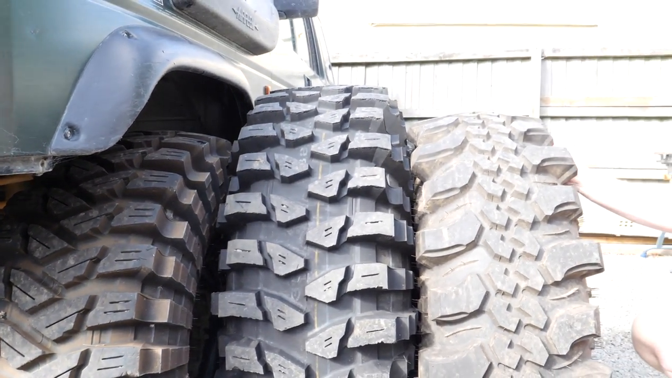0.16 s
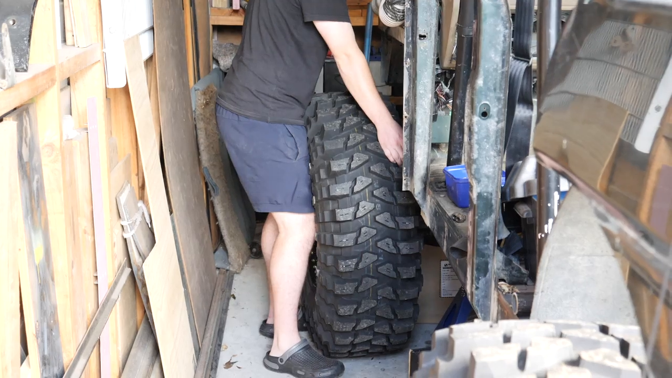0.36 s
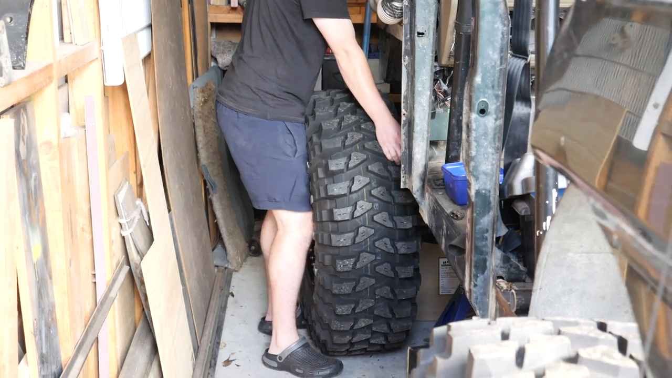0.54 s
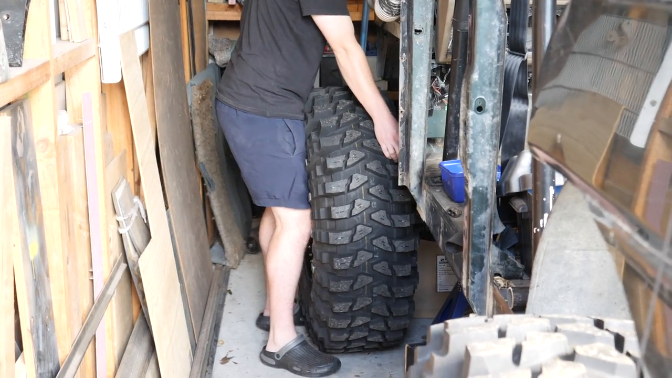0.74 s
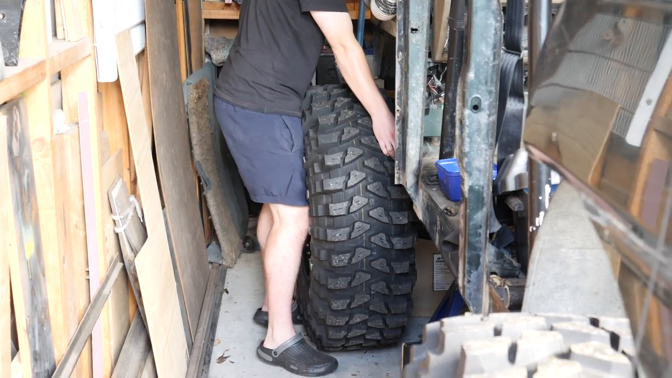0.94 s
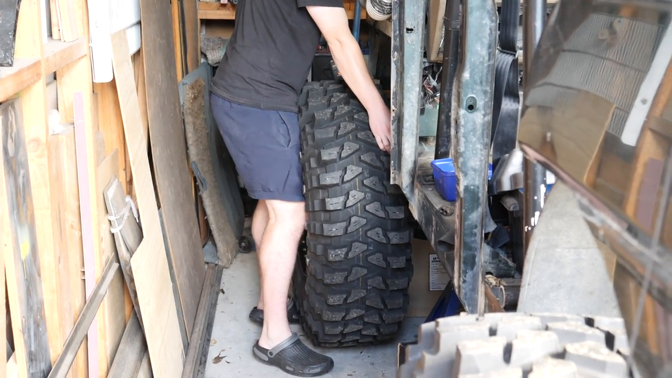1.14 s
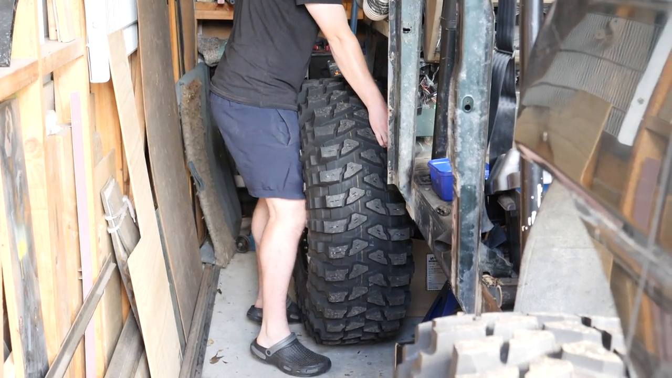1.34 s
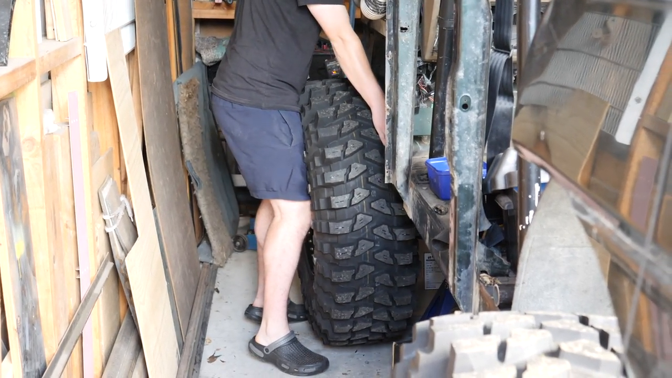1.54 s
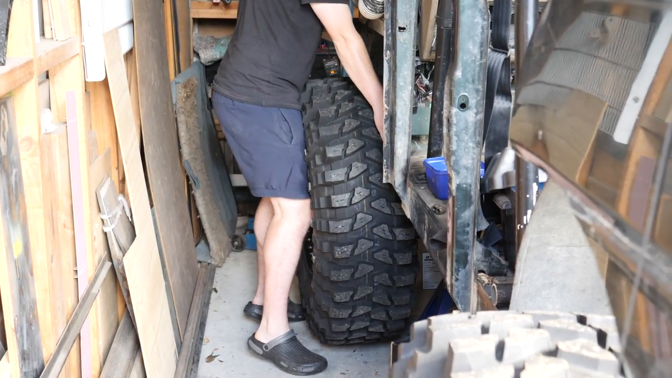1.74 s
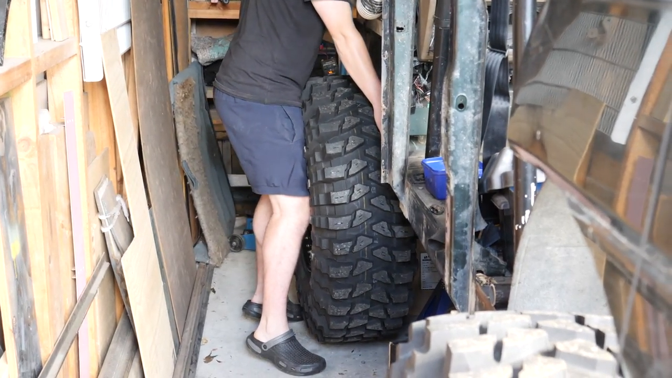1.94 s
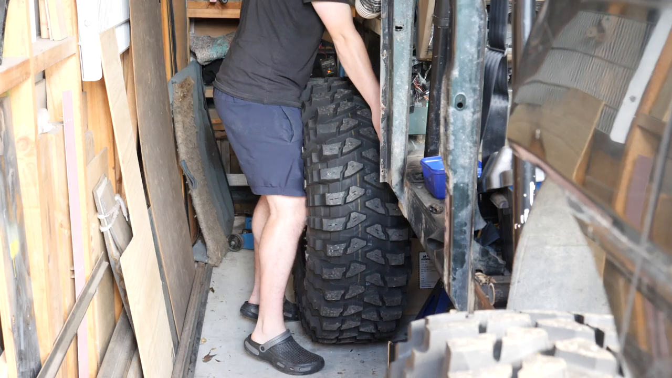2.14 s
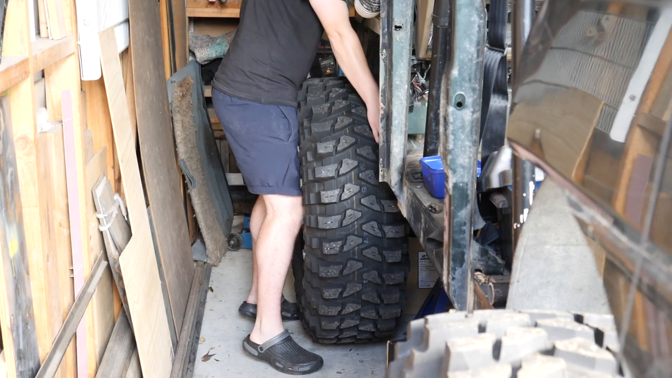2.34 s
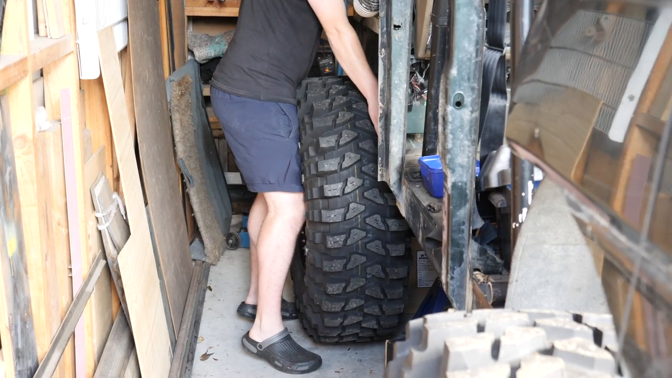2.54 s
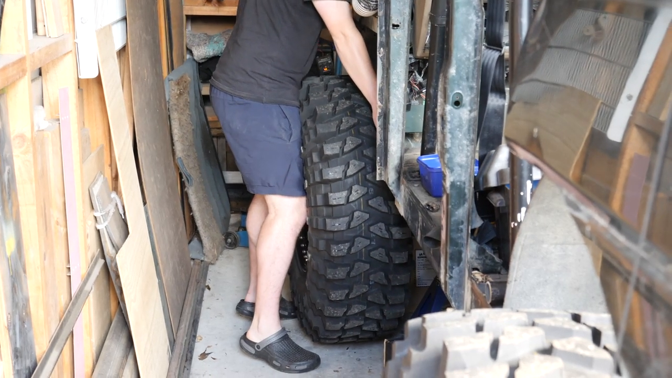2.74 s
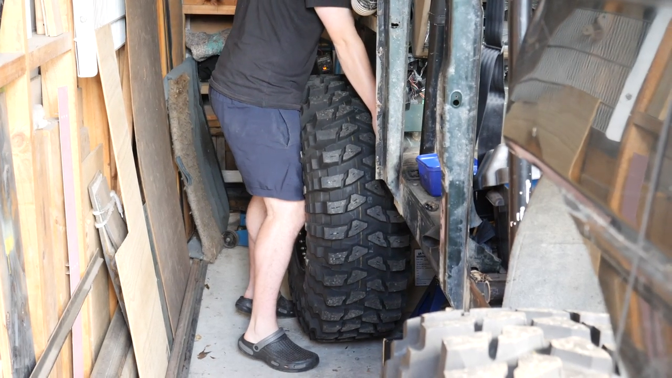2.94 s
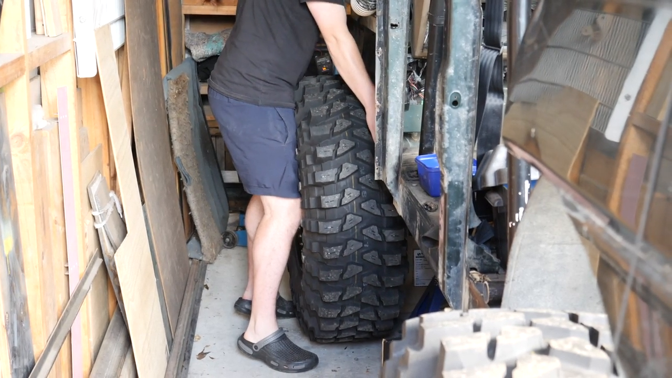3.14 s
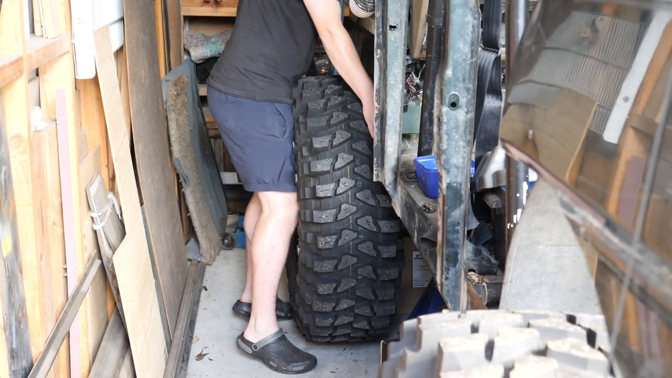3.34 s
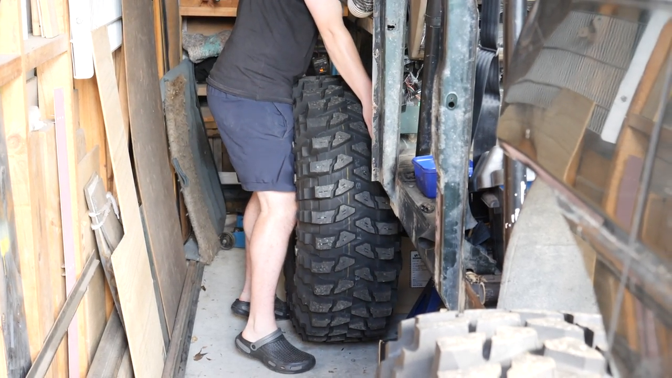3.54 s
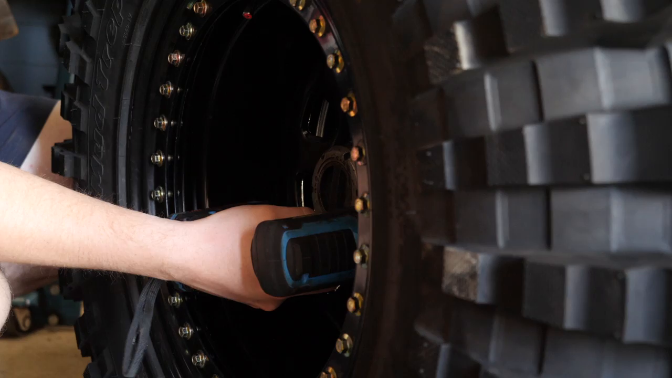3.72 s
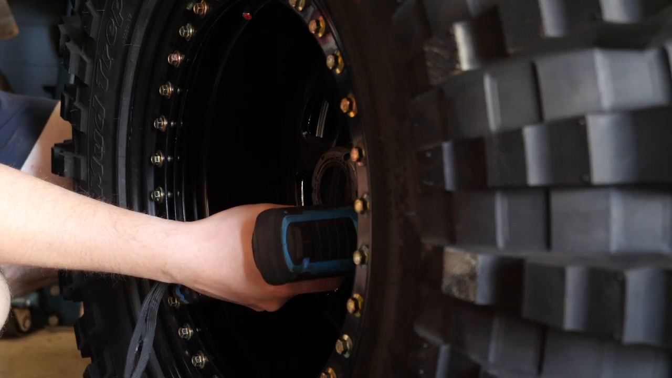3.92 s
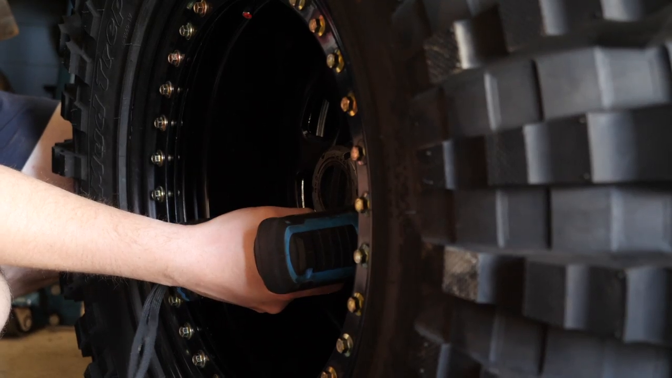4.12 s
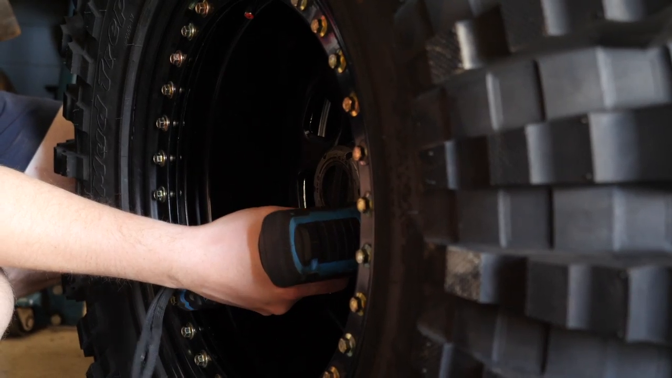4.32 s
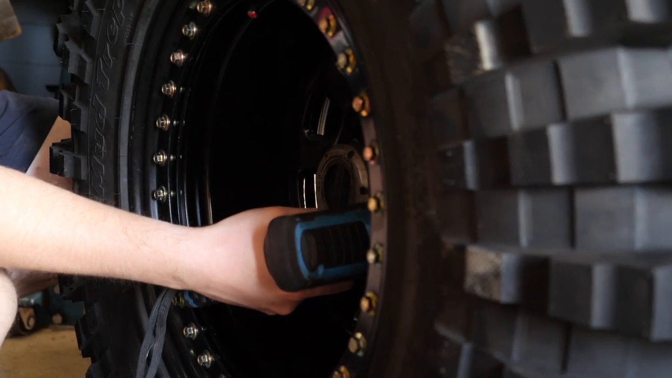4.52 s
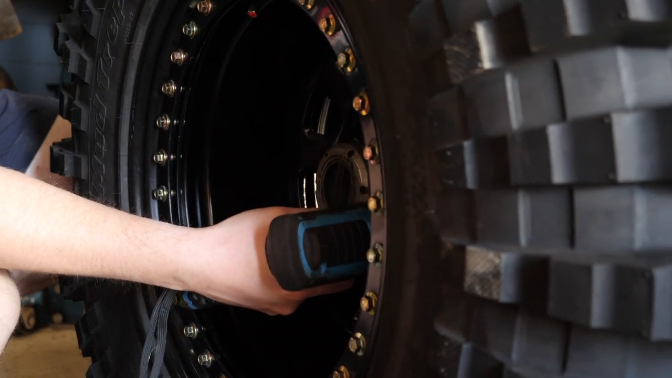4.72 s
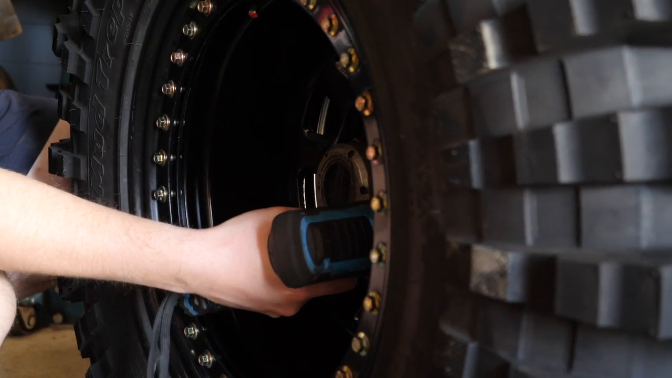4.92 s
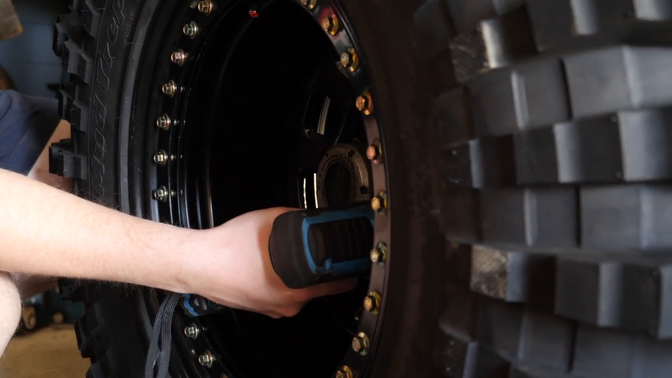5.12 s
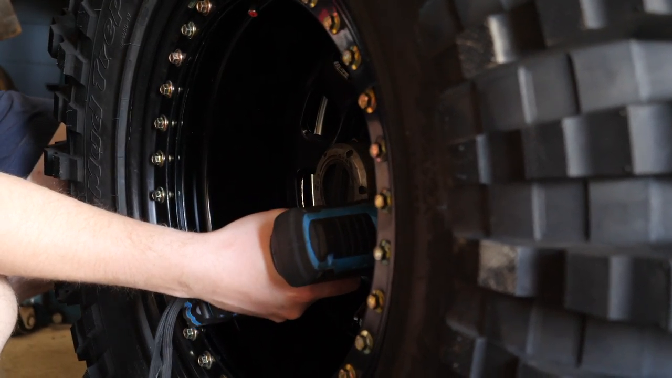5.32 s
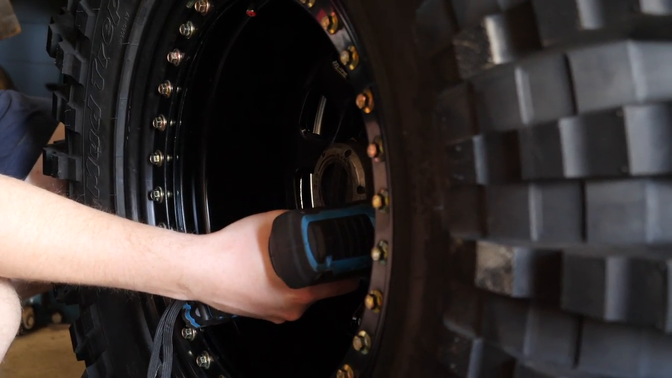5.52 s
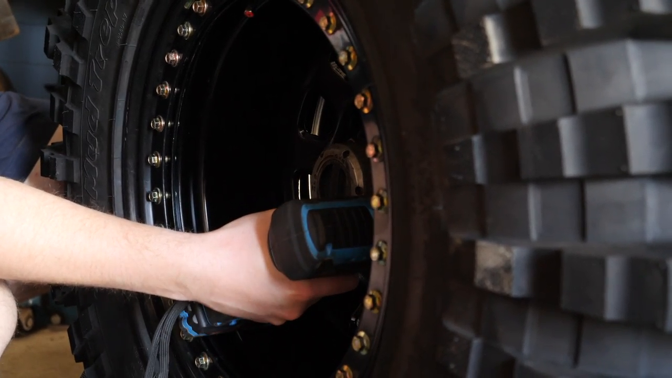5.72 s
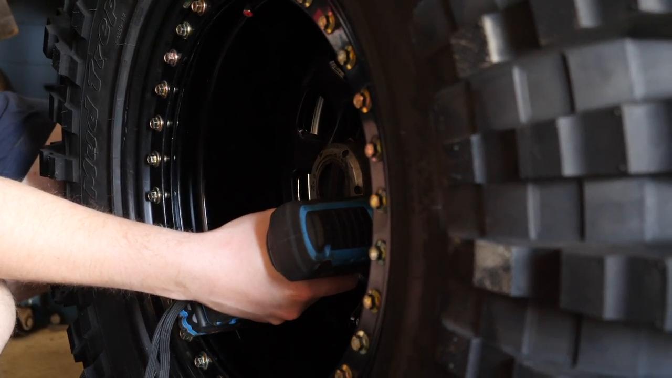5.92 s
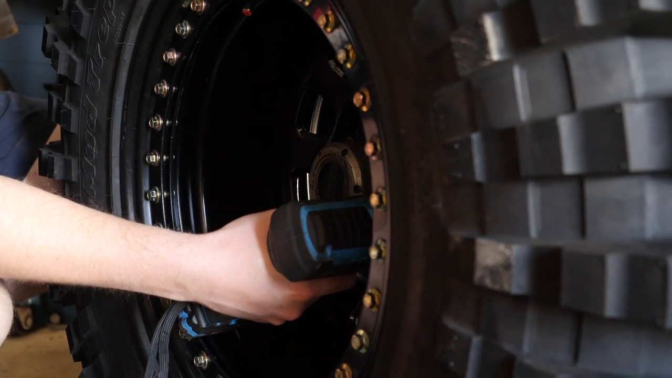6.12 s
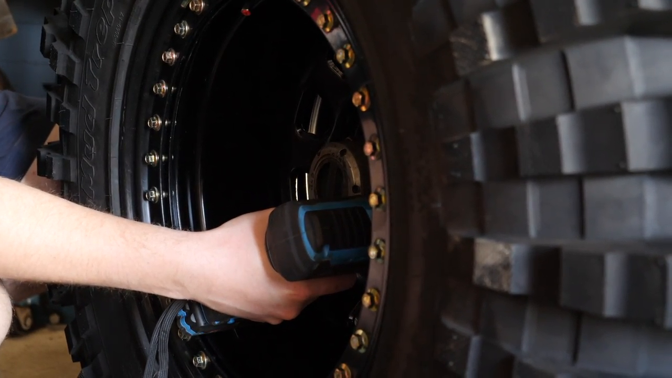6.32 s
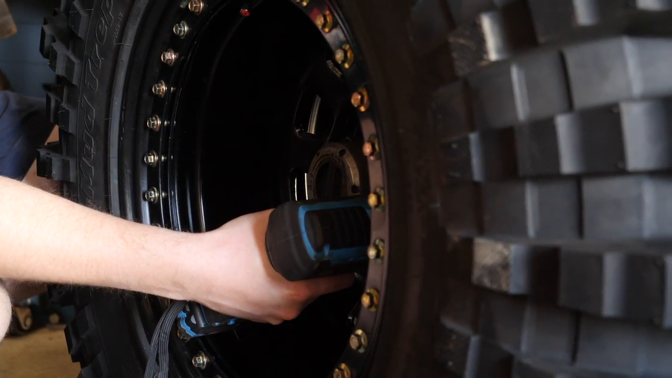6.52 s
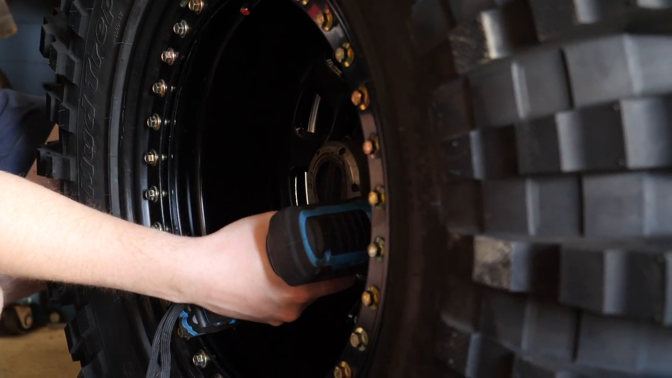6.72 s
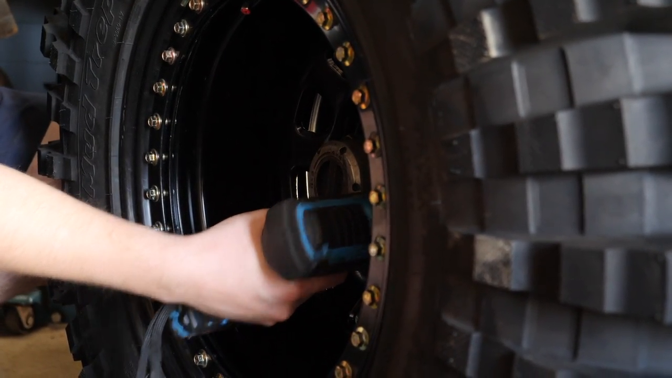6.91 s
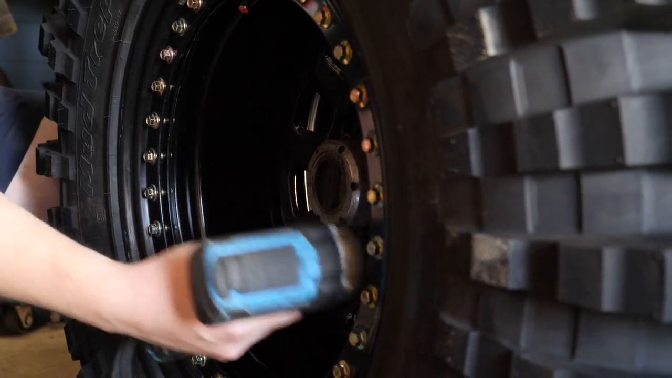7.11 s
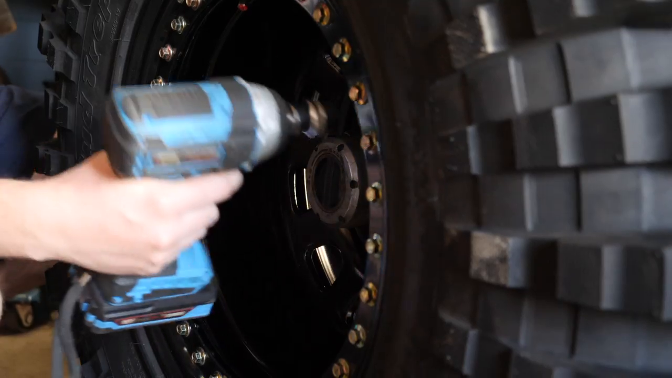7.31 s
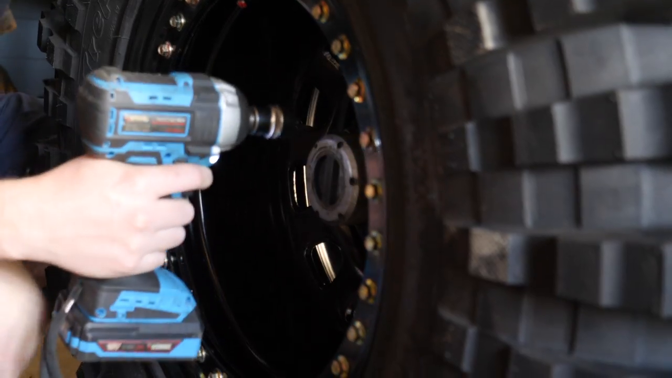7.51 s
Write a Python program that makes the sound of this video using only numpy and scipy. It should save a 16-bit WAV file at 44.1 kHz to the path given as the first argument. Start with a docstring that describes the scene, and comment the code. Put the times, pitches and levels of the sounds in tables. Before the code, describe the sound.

In a small cluttered workshop, a big wheel is shuffled onto its hub a few steps away: soft scuffs, steel knocks and clacks, then a hollow tyre bump. After a quiet gap, a cordless impact wrench at arm's length gives seven brief rattling pulls, chirping at each start; a few hammer hard, ringing the rim and overloading the microphone. The socket knocks loose and a sleeve swishes.

```python
"""In a home workshop a big off-road wheel is shuffled onto its hub: the tyre bumps, the steel rim knocks and clacks.
Then, close by, a cordless impact wrench runs a nut down in seven short trigger pulls: the motor chirps, gears
and socket rattle, and hammer blows set the rim ringing and overload the microphone. The socket is pulled off.
Contacts are short bursts of shaped noise, rubbing is a crowd of tiny grains, and ringing is made of fading sines."""
import sys
import numpy as np
from scipy import signal
from scipy.fft import rfft, irfft
from scipy.io import wavfile

SR = 44100
rng = np.random.default_rng(int(sys.argv[2]) if len(sys.argv) > 2 else 0)


def to_wav(sig):
    """Store sig (one row per channel, or 1-D mono) as 16-bit WAV at the path in sys.argv[1].

    Samples outside -1..1 are clipped; the rate is SR.
    """
    pcm = np.clip(np.atleast_2d(sig), -1, 1) * 32767
    pcm = np.round(pcm).astype(np.int16)
    wavfile.write(sys.argv[1], SR, pcm.T)  # frames by channels


N = 333396
TIME = np.arange(N) / SR   # seconds

# All dB in the tables are relative: they are set before the sounds are mixed.
# Trigger pulls. Each row: start and stop in seconds, starting jolt in dB, rattle in dB,
# resonance of the spinning nut in Hz, its level in dB.
PULLS = [(3.871, 3.984, -32, -32.5, 827, -34.5), (4.283, 4.447, -23.5, -25, 863, -37.5),
         (4.776, 4.916, -21, -28, 602, -40.5), (5.174, 5.36, -30, -26.5, 628, -35.5),
         (5.667, 5.776, -32, -26, 784, -38), (6.095, 6.243, -31, -26.5, 707, -41),
         (6.502, 6.679, -20.5, -24.5, 701, -30)]
# Tone of the gears. Each row: frequency in Hz, level in dB per Hz.
GEARS = [(40, -36.5), (75, -27.5), (130, -4), (280, -24), (500, -6.5), (1000, -4.5), (1500, -9.5),
         (2100, -9), (2700, -0.5), (3300, 4.5), (3900, -8.5), (5200, -7), (7500, -23.5), (11000, -29),
         (16000, -36.5)]
# Tone of a grainy scuff. Each row: frequency in Hz, level in dB per Hz.
SCUFF = [(200, -6.5), (900, 6), (1800, 7), (3500, 2.5), (5500, -5), (7500, -19), (15000, -23.5)]
# Tone of a sleeve swish or a scrape. Each row: frequency in Hz, level in dB per Hz.
SWISH = [(60, -37), (500, -8.5), (1500, 12), (4000, 10.5), (7000, 2), (12000, -4.5), (16000, -6.5)]
# Broad resonances of the hammer case. Each row: frequency in Hz, width in Hz, level in dB.
ANVIL = [(875, 130, -12), (1530, 180, -5), (2480, 89, -3), (3500, 600, 2.5), (5283, 190, 0)]


def from_db(db):
    """Turn decibels into a gain."""
    return 10 ** (np.asarray(db) / 20)


def rms_one(x):
    """Scale to an rms (average strength) of 1."""
    return x / np.sqrt(np.mean(x ** 2) + 1e-20)


def at_hz(points, hz):
    """Read a table between its points, along a log-frequency axis."""
    table_hz, value = np.transpose(points)
    return np.interp(np.log(np.maximum(hz, 1)), np.log(table_hz), value)


def drift(rate):
    """Slow wandering: straight lines between random points of spread 1, `rate` points a second."""
    knots = rng.standard_normal(int(N / SR * rate) + 2)
    return np.interp(TIME * rate, np.arange(len(knots)), knots)


def colour(x, spectrum, peaks=(), size=8192):
    """Causal filter with a smooth spectrum and resonances on top; white noise keeps its power."""
    hz = np.arange(size // 2 + 1) * SR / size
    lift = 1 + sum(from_db(db) ** 2 / (1 + (2 * (hz - f) / width) ** 2) for f, width, db in peaks)
    gain = rms_one(from_db(at_hz(spectrum, hz)) * np.sqrt(lift))
    # Folding the cepstrum forward makes the filter respond as early as it can.
    cepstrum = irfft(np.log(gain))
    cepstrum[1:size // 2] *= 2
    cepstrum[size // 2 + 1:] = 0
    response = irfft(np.exp(rfft(cepstrum)))
    return signal.oaconvolve(x, response)[:N]


def ring(x, hz, t60):
    """A resonator: a unit click starts a sine of height 1 that falls by 60 dB in t60 seconds."""
    shrink = from_db(-60 / (t60 * SR))
    turn = 2 * np.pi * hz / SR
    return signal.lfilter([0, np.sin(turn)], [1, -2 * shrink * np.cos(turn), shrink ** 2], x + 1e-18)


def clicks(rows):
    """One click for each row of time in seconds and level in dB."""
    out = np.zeros(N)
    for s, db in rows:
        out[round(s * SR)] += from_db(db)
    return out


def bursts(rows, t60, rise_s):
    """Each contact shakes a crowd of dense modes: noise that swells quickly and dies away."""
    t = TIME[:SR]
    shape = (1 - np.exp(-t / rise_s)) * from_db(-60 * t / t60)
    power = signal.oaconvolve(clicks(rows) ** 2, (shape / shape.max()) ** 2)[:N]
    return np.sqrt(np.abs(power)) * rng.standard_normal(N)


def grains(per_s, spread_db):
    """Random tiny contacts of uneven size, with an rms of 1."""
    sizes = from_db(spread_db * np.minimum(rng.exponential(1, N), 4))
    present = rng.random(N) < per_s / SR
    return rms_one(present * sizes * rng.standard_normal(N))


def stroke(start, length, swell_s, release_s):
    """Loudness of a rubbing movement: it swells, holds until its length is over and dies away."""
    t = np.maximum(TIME - start, 0)
    return (1 - np.exp(-t / swell_s)) * np.exp(-np.maximum(t - length, 0) / release_s)


def strokes(rows, release_s):
    """Add up rows of start, length and swell (s), bright dB, dull dB into a bright and a dull loudness."""
    return sum(np.outer(from_db(levels), stroke(start, length, swell, release_s))
               for start, length, swell, *levels in rows)


def hammer():
    """Each blow is a bright crack, a clang of the case and a ring of steel; weaker modes blur into a wash."""
    # Tones of the crack and of the clang. Each row: frequency in Hz, level in dB per Hz.
    crack_tone = [(50, -52), (300, -28.5), (1500, -6.5), (4000, 5.5), (6000, -2.5), (8000, -5.5),
                  (11000, -4), (16000, -20)]
    steel_tone = [(35, -57.5), (60, -28.5), (448, -11), (842, -1), (1220, -8), (1660, -2.5), (2050, -5.5),
                  (2410, 0), (2650, -2), (3500, -3), (4320, -9), (5210, -3.5), (7230, -16), (9790, -21.5),
                  (16000, -29)]
    blows = hammer_blows()
    crack = colour(bursts(blows, t60=0.05, rise_s=0.00083), crack_tone)
    clang = colour(bursts(blows, t60=0.099, rise_s=0.00087), steel_tone, ANVIL)
    crowd = [(150, -21.0), (450, -11.0), (620, 5.0), (850, 0.0), (1250, -17.0), (2300, -8), (3300, -5),
             (4400, -11.5), (5300, -9.5), (7000, -24), (14000, -41.0)]   # (Hz, dB per Hz)
    clusters = [(3118, 42, 8.7), (5215, 70, 8.3)]   # (Hz, width Hz, dB)
    wash = colour(bursts(blows, t60=0.45, rise_s=0.0017), crowd, clusters)
    return from_db(-6) * crack + from_db(-2.5) * clang + from_db(-20) * rim(blows) + from_db(-31) * wash


def hammer_blows():
    """List every contact of steel on steel in the drive: grazes, runs of blows and halts."""
    # The hammer grazes the anvil, then catches and strikes at a steady beat.
    # Each row: first blow in seconds, number of blows, blow in dB, graze in dB.
    hammering = [(3.9015, 1, -6, -26), (3.918, 1, -10, -22.5), (5.7454, 1, 1, -17.5), (6.129, 1, -2, -21.5),
                 (6.174, 3, 1.5, -10), (6.546, 1, -1, -30), (6.581, 3, 0, -5.5)]
    # The drive snaps to a halt. Each row: time in seconds, level in dB.
    halts = [(3.9958, -25), (4.467, -30.5), (5.355, -26), (6.651, -17)]
    beat_s, graze_lead_s = .027, .009   # from blow to blow; from the graze to the first blow
    blow_loss_db = 0.62   # each blow is weaker than the last by this much
    grazes = [(s - graze_lead_s, graze_db) for s, _, _, graze_db in hammering]
    runs = [(s + k * beat_s, db - k * blow_loss_db)
            for s, count, db, _ in hammering for k in range(round(count))]
    return grazes + runs + halts


def rim(rows, uneven_db=3.0, loose_db=-6):
    """Each blow adds energy to every mode, by a share of its own, and the energy leaks away."""
    # Ringing of the steel rim, socket and anvil.
    # Each row: frequency in Hz, level in dB, time to fall by 60 dB in seconds.
    modes = [(535, -24.5, 0.53), (611, -16, 0.72), (700, -20.5, 0.25), (824, -22, 0.7), (896, -26.5, 0.43),
             (1080, -26.5, 0.68), (1500, -26, 0.83), (1596, 0.5, 0.12), (1780, -6, 0.14), (1890, -22.5, .4),
             (2040, -23, 0.43), (2256, -18, 0.68), (2340, 3.5, 0.14), (2504, 1.5, .12), (2650, -17.5, 0.21),
             (2450, -18, 0.22), (2800, -1, .19), (2950, -22.5, 0.86), (3065, -16.5, 0.56), (3110, 4, 0.26),
             (3436, 3.5, 0.11), (3646, -1.5, 0.19), (3530, -7.5, 0.37), (3602, -23, 0.65),
             (3770, -7.5, 0.12), (4000, -28, 0.41), (4470, -11, .13), (5190, 6.5, 0.05),
             (4960, -16.5, 0.39), (5740, -28.5, 0.32), (6650, -38.5, 0.52), (8430, -31, .28)]
    s, blow_db = np.transpose(rows)
    shares_db = uneven_db * rng.standard_normal((len(rows), len(modes)))
    loose = s < PULLS[4][0]   # until the fifth pull the nut is slack and passes little treble to the rim
    out = 0
    for (hz, db, t60), share_db in zip(modes, shares_db.T):
        muffle_db = loose * loose_db * np.clip(np.log2(hz / 900), 0, 1.5)
        blows = clicks(zip(s, blow_db + share_db + muffle_db)) ** 2 + 1e-24
        energy = signal.lfilter([1], [1, -from_db(-120 / (t60 * SR))], blows)
        tone = np.sin(2 * np.pi * (hz * TIME + rng.random()))
        out = out + from_db(db) * np.sqrt(energy) * tone
    return out


def drive_train(spin_up_s=.06, coast_s=0.0089, first_bite=.2, mesh_hz=1250, whine_db=-13, rough_db=1.54,
                nut_t60=0.049, wobble_db=3):
    """Motor speed drives the gear rattle, the loose socket's clatter, the hum of the nut and a faint whine."""
    # The nut binds in its thread and the rattle swells.
    # Each row: time in seconds, length in seconds, extra level in dB.
    binds = [(4.408, 0.013, 5), (4.838, 0.026, 2.5), (5.263, .035, 3.5), (5.727, .01, 8)]
    rattle, hum, whine = np.zeros((3, N))
    for start, stop, _, rattle_db, nut_hz, nut_db in PULLS:
        span = slice(int(start * SR), int((stop + .2) * SR))   # leaves time to coast down
        t = TIME[span]
        spin_up = 1 - (1 - first_bite) * np.exp(-(t - t[0]) / spin_up_s)
        speed = spin_up * np.exp(-np.maximum(t - stop, 0) / coast_s)
        rattle[span] += from_db(rattle_db) * speed
        shaking = np.diff(rng.standard_normal(len(t) + 1))
        hum[span] += from_db(nut_db) * speed * rms_one(ring(shaking, nut_hz, nut_t60))
        mesh = np.sin(2 * np.pi * mesh_hz * np.cumsum(speed) / SR)   # pitch follows the speed
        whine[span] += from_db(rattle_db + whine_db) * speed * mesh
    teeth = from_db(rough_db * drift(220)) * grains(per_s=6200, spread_db=-1.5)
    clatter = from_db(-8) * grains(per_s=900, spread_db=.5)
    bind_db = sum(db * np.exp(-((TIME - s) / length) ** 2) for s, length, db in binds)
    rattle = rattle * from_db(-1.5 + bind_db)
    housing = [(2370, 83, 0.0066), (2730, 56, 0), (3040, 71, 0.19), (3380, 160, 1)]   # (Hz, width Hz, dB)
    gears = colour(rattle * (teeth + clatter), GEARS, housing)
    return gears + hum * from_db(wobble_db * drift(50)) + whine


def motor_chirps(swell_s=.006):
    """The starting current makes the motor housing sing briefly, with a tick as the slack is taken up."""
    t = TIME[:SR // 10]
    shape = (t / swell_s * np.exp(1 - t / swell_s)) ** 2
    housing = [(3120, -2.5), (3340, 2), (3520, -12.0)]   # (Hz, dB)
    chirp = shape * sum(from_db(db) * np.sin(2 * np.pi * hz * t) for hz, db in housing)
    jolts = [(start, jolt_db) for start, _, jolt_db, *_ in PULLS]
    slack = colour(bursts(jolts, t60=.06, rise_s=.001), GEARS)
    return signal.oaconvolve(clicks(jolts), chirp)[:N] + from_db(-13.5) * slack


def trigger(travel_s=0.038, rub_db=-62):
    """The trigger slides in with a rub of steady noise for a moment before the motor starts."""
    sliding = sum((TIME > start - travel_s) & (TIME < start) for start, *_ in PULLS)
    return from_db(rub_db) * colour(sliding * rng.standard_normal(N), SCUFF, ANVIL)


def socket(ping_hz=12400, ping_t60=.2):
    """The socket scrapes off the nut, stirs the rim and pings once it is free."""
    # Knocks on the nut as the socket comes off. Each row: time in seconds, level in dB.
    knock_times = [(6.823, -51), (6.953, -43.5), (6.979, -36.5), (6.996, -36), (7.045, -47), (7.207, -48.5)]
    # Pings of the freed socket. Each row: time in seconds, level in dB.
    ping_times = [(6.981, -55), (7.056, -50)]
    knocks = colour(bursts(knock_times, t60=0.11, rise_s=0.0014), SCUFF, ANVIL)
    touch_tone = [(3000, -18), (10000, 6), (14000, -12)]   # (Hz, dB per Hz)
    touch = colour(bursts(ping_times, t60=0.034, rise_s=0.00056), touch_tone)
    ping = ring(clicks(ping_times), ping_hz, ping_t60)
    return knocks + from_db(-10.0) * rim(knock_times) + ping + from_db(-10) * touch


def wheel(scrape_lead_s=0.005, hub_hz=2300, hub_t60=0.82):
    """The rocked wheel scrapes and clacks on the studs, knocks on the hub and bumps its tyre: noise bursts."""
    # Clacks of the rim on the studs, knocks on the hub and hollow bumps of the tyre.
    # Each row: time in seconds, level in dB.
    clack_times = [(1.071, -42.5), (1.162, -43), (1.718, -30), (1.858, -28), (1.932, -28), (2.044, -31),
                   (2.3, -37.5), (2.357, -37.5), (2.453, -41.5), (2.524, -43.5), (2.643, -39.5),
                   (2.759, -44.5)]
    knock_times = [(0.935, -36), (1.596, -41), (1.658, -23)]
    bump_times = [(2.087, -28), (2.206, -10), (2.275, -19), (2.783, -43), (3.31, -54)]
    # Their tones. Each row: frequency in Hz, level in dB per Hz.
    clack_tone = [(47, -32), (80, -18.5), (277, -27), (441, -15.5), (601, -22), (896, -9), (1250, -14.5),
                  (1340, -25.5), (1630, -15.5), (2130, -24.5), (3320, -24.5), (3960, -33), (5520, -36),
                  (13400, -71), (16000, -59.5)]
    knock_tone = [(29, -49.5), (50, -2), (104, 1.5), (330, -7), (448, -10), (638, -17), (1180, -12),
                  (1360, -18.5), (1720, -12), (2030, -39), (2330, -12.5), (2500, -15), (14000, -58.5)]
    bump_tone = [(50, -27.5), (90, -9), (200, -9.5), (330, -14.5), (440, 5), (560, -3.5), (760, -15.5),
                 (1300, -26.5), (2000, -35.5), (4500, -62.5), (12000, -75.5)]
    # Resonances of the rim on the studs, and of the hub. Each row: frequency in Hz, width in Hz, level in dB.
    stud_peaks = [(883, 53, 7.5), (990, 70, -30.5), (1200, 100, -19.5), (1720, 150, -13.5)]
    hub_peaks = [(1690, 110, 9), (2287, 90, 4.5), (3270, 230, 0.5)]
    scrape_times = [(s - scrape_lead_s, db) for s, db in clack_times]
    scrapes = colour(bursts(scrape_times, t60=0.11, rise_s=.001), SWISH)
    clacks = colour(bursts(clack_times, t60=0.13, rise_s=0.0081), clack_tone, stud_peaks)
    knocks = colour(bursts(knock_times, t60=0.18, rise_s=0.001), knock_tone, hub_peaks)
    bumps = colour(bursts(bump_times, t60=0.038, rise_s=0.0028), bump_tone)
    hub = ring(clicks(knock_times), hub_hz, hub_t60)
    # The tread drags over grit.
    drag = from_db(-50.5) * stroke(start=2.206, length=.08, swell_s=.005, release_s=.01)
    grit = colour(drag * grains(per_s=1200, spread_db=-4.5), SCUFF)
    steel = from_db(-20.5) * scrapes + from_db(-1.5) * clacks + from_db(-6.0) * knocks + from_db(-21) * hub
    return steel + from_db(-4.5) * bumps + grit


def handling(pressure_db=1.0, seating_db=-58.0):
    """Grainy scuffs over a soft rumble while the wheel is moved; later the socket slides onto the nut."""
    # Hands, clothes and rubber rub as the wheel is shifted.
    # Each row: start, length and swell in seconds, scuff in dB, rumble in dB.
    shoves = [(0, 0.27, 0.0045, -74, -73), (.285, .27, 0.0047, -63.5, -89), (.72, 0.22, 0.14, -59, -77),
              (.95, 0.35, 0.026, -64.5, -71.5), (1.345, 0.035, 0.0084, -60, -83),
              (1.5, 1.334, 0.065, -62.5, -71.5), (2.88, .14, 0.055, -56.5, -67),
              (3.28, 0.14, 0.016, -62.5, -66)]
    # Tone of the rumble. Each row: frequency in Hz, level in dB per Hz.
    rumble_tone = [(30, 0.5), (100, -5), (170, 3.5), (400, -5.5), (900, -9), (2000, -37)]
    scuff, rumble = strokes(shoves, release_s=0.032) * from_db(pressure_db * drift(25))
    seating = from_db(seating_db) * stroke(start=3.718, length=.04, swell_s=.006, release_s=.003)
    fibres = grains(per_s=5000, spread_db=1.5)
    scuffs = colour((scuff + seating) * fibres, SCUFF)
    return scuffs + from_db(4.0) * colour(rumble * rng.standard_normal(N), rumble_tone)


def wrench_swings():
    """The wrench is pulled back, then lifted away: a grainy sleeve swish and a dull rub of the grip."""
    # Each row: start, length and swell in seconds, sleeve swish in dB, rub of the grip in dB.
    swings = [(7.115, 0.09, 0.05, -59.5, -47), (7.25, 0.285, 0.015, -68.5, -66)]
    # Tone of the grip. Each row: frequency in Hz, level in dB per Hz.
    grip_tone = [(70, -30), (150, 4.5), (350, -5.5), (600, 6), (1100, 0), (1800, -5), (5000, -19)]
    swish, grip = strokes(swings, release_s=0.033)
    sleeve = from_db(6.5) * colour(swish * grains(per_s=7500, spread_db=3.0), SWISH)
    return sleeve + colour(grip * rng.standard_normal(N), grip_tone)


def creaks(slip_s=.025, uneven_db=1.5):
    """Something sticks and slips in runs of small ticks, evenly spaced but uneven in strength."""
    # Each row: first tick in seconds, number of ticks, level in dB.
    creak_runs = [(0.098, 1, -59), (0.463, 1, -49.5), (1.496, 3, -54.5), (3.223, 7, -56), (3.416, 1, -53.5),
                  (3.49, 2, -55), (6.886, 1, -47.5), (7.296, 2, -46)]
    ticks = [(s + k * slip_s, db + uneven_db * rng.standard_normal())
             for s, count, db in creak_runs for k in range(round(count))]
    return colour(bursts(ticks, t60=0.037, rise_s=0.00027), SCUFF)


def squeak(pitch_hz=4250, level_db=-72, waver=0.026, stutter_db=4):
    """Rubber slides on the floor with a thin, broken squeak: a sine of unsteady pitch and level."""
    pitch = pitch_hz * (1 + waver * drift(900))
    onset = stroke(start=.77, length=.14, swell_s=.03, release_s=.015)
    slip = onset * from_db(level_db + stutter_db * drift(120))
    return slip * np.sin(2 * np.pi * np.cumsum(pitch) / SR)


def breeze(gust_db=-59):
    """A puff of wind on the microphone at the start, made of low noise."""
    # Tone of the wind. Each row: frequency in Hz, level in dB per Hz.
    wind_tone = [(25, 3), (60, 13), (100, -19), (300, -14), (1500, -45)]
    gust = from_db(gust_db) * stroke(start=0, length=0.16, swell_s=0.017, release_s=.06)
    return gust * colour(rng.standard_normal(N), wind_tone)


def still_air(level_db=-65.5):
    """The still air of the workshop: steady, soft noise."""
    # Tone of the air. Each row: frequency in Hz, level in dB per Hz.
    air_tone = [(20, 1), (45, -1), (62, -7.5), (120, 0), (200, -5), (300, -10), (600, -11.5), (870, 0),
                (1200, -14), (3600, -16.5), (7500, -27.5), (15000, -33.5)]
    return from_db(level_db) * colour(rng.standard_normal(N), air_tone)


def workshop(x, build_s=0.0016):
    """A diffuse echo from the cluttered walls: bands of fading noise, of which the lows last longest."""
    # Each row: frequency in Hz, time to fall by 60 dB in seconds.
    room_t60 = [(100, 0.79), (260, 0.43), (700, 0.33), (1840, 0.29), (4850, 0.17), (12800, 0.11)]
    t, tail = TIME[:SR], 0
    edges = np.geomspace(50, 18000, 10)   # band limits in Hz
    for low, high in zip(edges, edges[1:]):
        band_filter = signal.butter(2, [low, high], "band", fs=SR, output="sos")
        band = signal.sosfilt(band_filter, rng.standard_normal(SR))
        tail = tail + band * from_db(-60 * t / at_hz(room_t60, np.sqrt(low * high)))
    tail = tail * (1 - np.exp(-t / build_s))
    return signal.oaconvolve(x, tail / np.sqrt(np.sum(tail ** 2)))[:N]


def scene():
    """The wheel is a few steps away, with more echo; the wrench is at arm's length."""
    far = wheel()
    near = hammer() + drive_train() + motor_chirps() + trigger() + socket()
    rubbing = handling() + wrench_swings() + creaks() + squeak()
    echo = workshop(from_db(-8) * far + from_db(-18.0) * near)
    return (far + near + rubbing + breeze() + still_air() + echo)[None]


def record(dry, ceiling=0.78, hardness=2.6, low_cut_hz=55, cutoff_hz=16000):
    """The microphone flattens the loudest peaks; the deep bass and the top are cut."""
    clipped = dry / (1 + np.abs(dry / ceiling) ** hardness) ** (1 / hardness)
    bass_cut = signal.butter(2, low_cut_hz, "high", fs=SR, output="sos")
    thinned = signal.sosfilt(bass_cut, clipped)
    top_cut = signal.ellip(8, .05, 50, cutoff_hz, fs=SR, output="sos")
    return signal.sosfiltfilt(top_cut, thinned)


dry = scene()
out = record(dry)
to_wav(out)
```